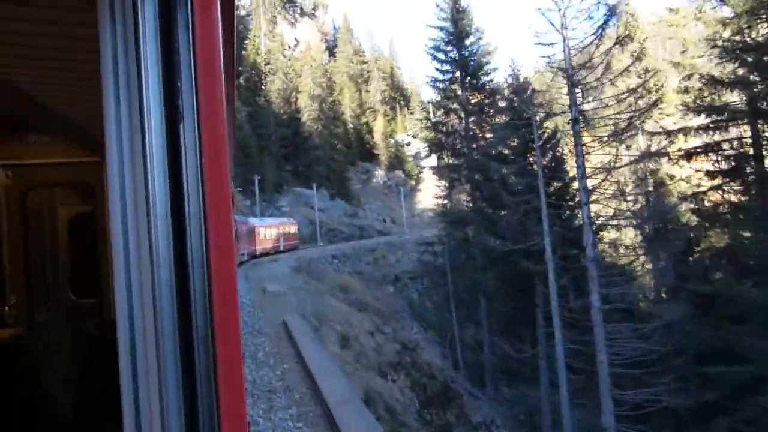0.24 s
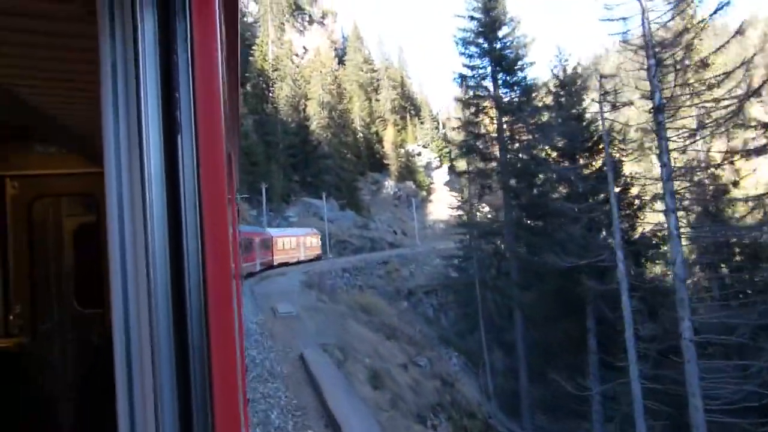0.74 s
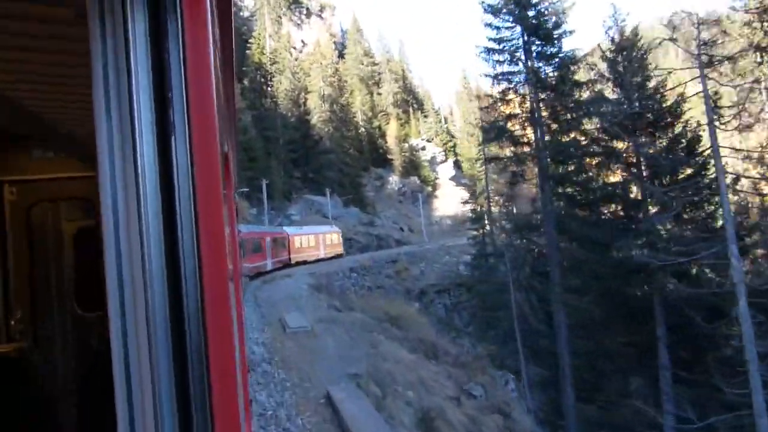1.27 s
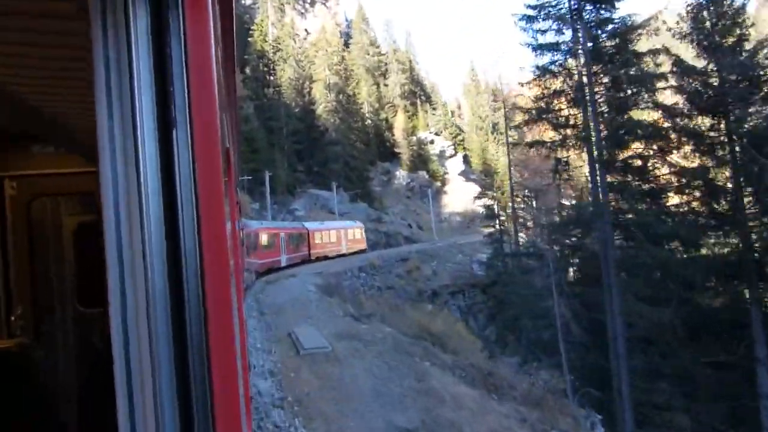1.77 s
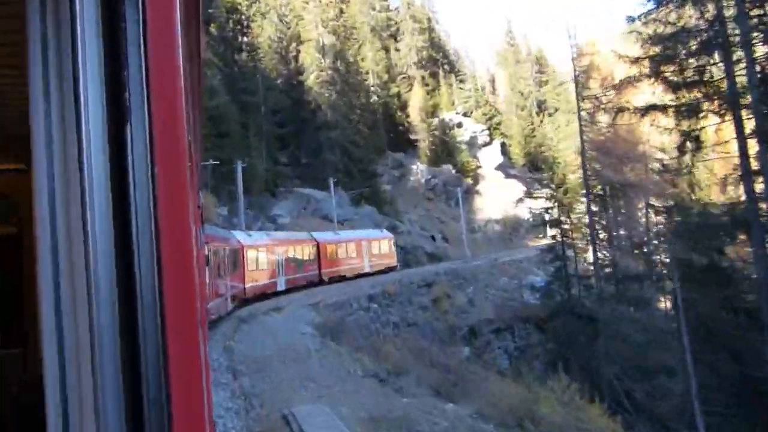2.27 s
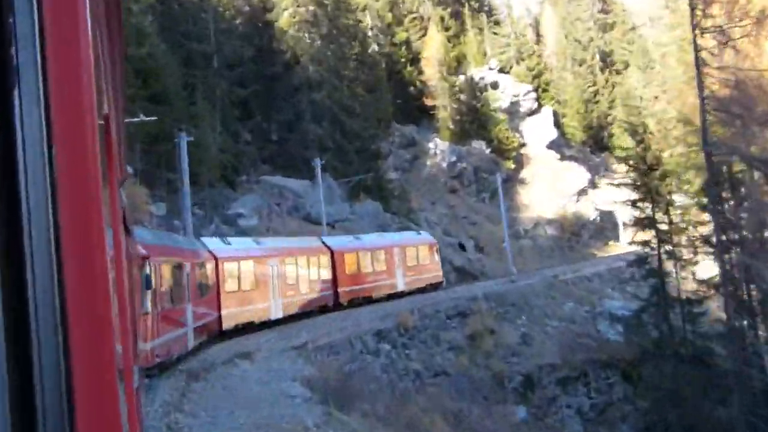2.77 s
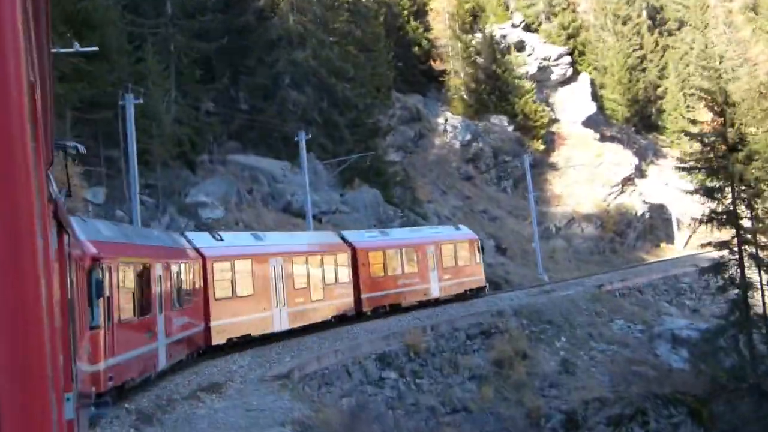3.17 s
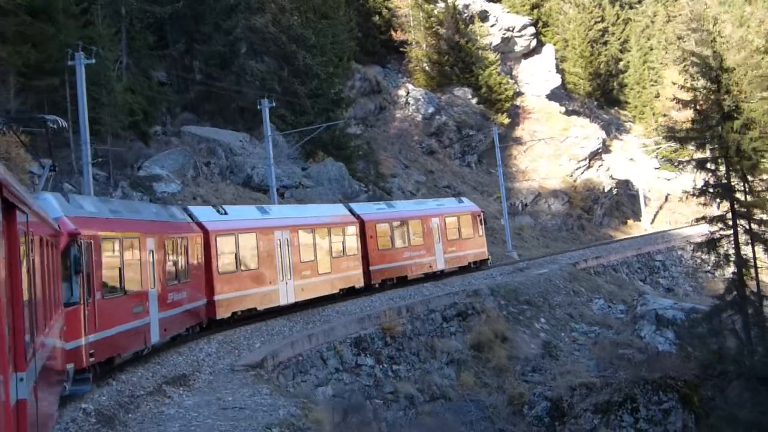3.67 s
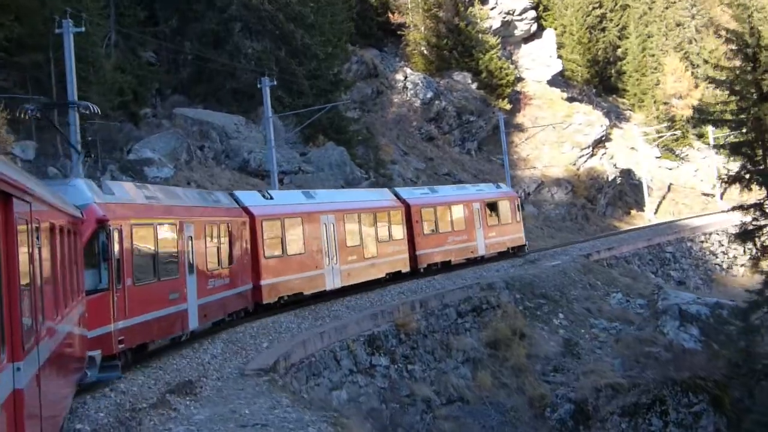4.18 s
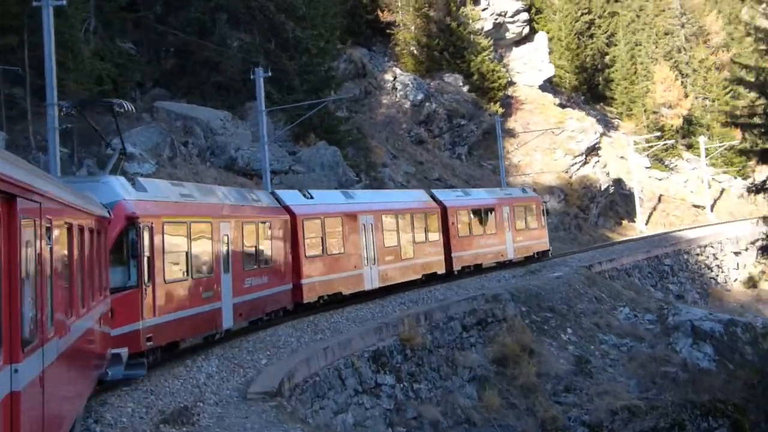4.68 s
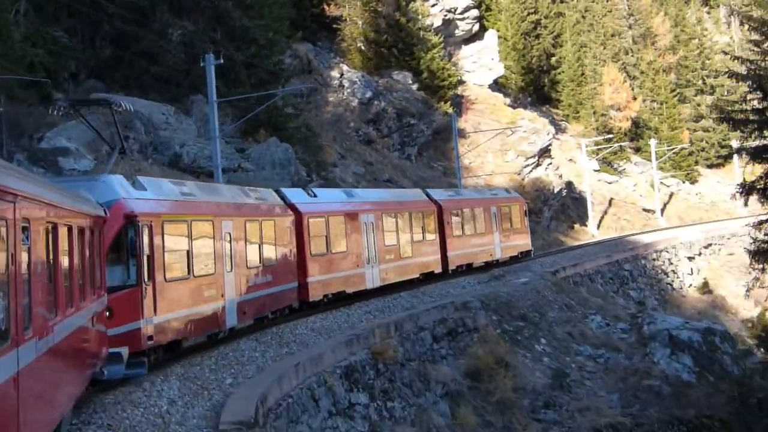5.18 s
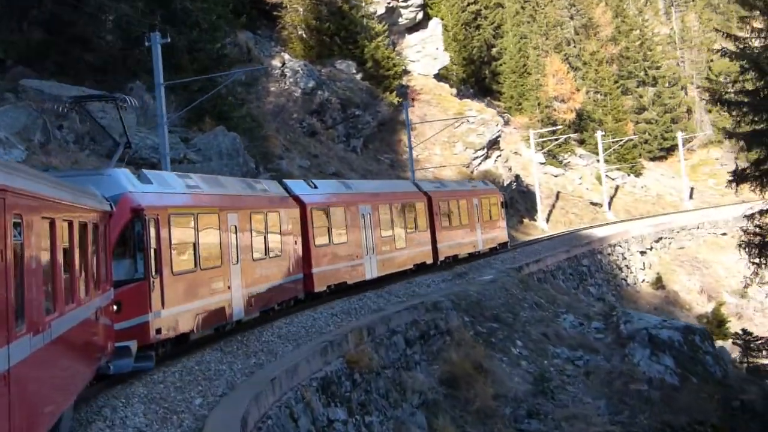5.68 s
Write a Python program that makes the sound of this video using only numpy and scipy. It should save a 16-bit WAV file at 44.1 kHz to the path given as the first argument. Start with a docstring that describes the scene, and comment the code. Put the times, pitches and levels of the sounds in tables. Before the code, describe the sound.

Piercing wheel squeals swell and overlap as a train rounds a bend, with rumble, hiss and gusts at an open window.

```python
"""Wheels squeal as a narrow-gauge train rounds a tight mountain curve, heard from an open carriage window.
Sideways slip on the rails excites their modes; each tone arrives once direct and pure, and many times
off passing ballast, rocks and trees, smeared by Doppler shift. Beneath it the wheels roar and hiss,
flanges scrape and jolts make the carriage boom. Gusts buffet the microphone, and the strong ones
make a limiter duck the whole sound."""
import sys
import numpy as np
from scipy import signal
from scipy.fft import rfft, irfft, next_fast_len
from scipy.io import wavfile
from scipy.ndimage import uniform_filter1d

SR = 44100
rng = np.random.default_rng(int(sys.argv[2]) if len(sys.argv) > 2 else 0)


def to_wav(s):
    """Save 16-bit WAV."""
    ch = np.atleast_2d(s).T  # columns
    pcm = np.round(np.clip(ch, -1, 1) * 32767)  # PCM
    wavfile.write(sys.argv[1], SR, pcm.astype(np.int16))


N = 261513
TIME = np.arange(N) / SR
FREQ = np.fft.rfftfreq(N, 1 / SR)
TRAIN_SPEED, SOUND_SPEED = 5.8, 343  # m/s


def undb(db):
    """Amplitude ratio of a level in decibels."""
    return 10 ** (np.asarray(db) / 20)


def envelope(rows, column):
    """Gain over time, interpolated in decibels from one column of a table."""
    rows = np.asarray(rows)
    return undb(np.interp(TIME, rows[:, 0], rows[:, column]))


def swell(start, end, db, growth, decay):
    """Envelope of a self-excited vibration: exponential growth, saturation, exponential decay."""
    return undb(db - growth * np.maximum(start - TIME, 0) - decay * np.maximum(TIME - end, 0))


def pulse(at, half_length):
    """Gaussian pulse in time, 1 at its peak."""
    return np.exp(-.5 * np.minimum(((TIME - at) / half_length) ** 2, 100))


def colour(points):
    """Spectral envelope through (f/Hz, level/dB) points on a logarithmic frequency axis."""
    hz, db = np.transpose(points)
    return undb(np.interp(np.log(FREQ + 1), np.log(hz), db))


def resonance(hz, width_hz):
    """Lorentzian resonance curve over frequency, 1 at its centre."""
    return 1 / (1 + (2 * (FREQ - hz) / width_hz) ** 2)


def noise(shape):
    """White noise filtered by a spectral envelope; rms 1."""
    size = next_fast_len(N)
    gain = np.interp(np.fft.rfftfreq(size, 1 / SR), FREQ, shape)
    x = irfft(rfft(rng.standard_normal(size)) * gain, size)[:N]
    return x / x.std()


def wander(rate_hz):
    """Slow random modulation: low-passed noise of standard deviation 1."""
    step, size = 64, 4096
    times = TIME[::step]
    rolloff = 1 + (np.fft.rfftfreq(size, step / SR) / rate_hz) ** 4
    slow = irfft(rfft(rng.standard_normal(size)) / rolloff)
    return np.interp(TIME, times, slow[:len(times)] / slow.std())


def stereo(mid, side):
    """Left and right as the sum and difference of mid and side."""
    return np.array([mid + side, mid - side])


def rolling_noise():
    """Roughness excitation: steel on steel makes rails and bogies roar and the contact patches hiss."""
    # rolling noise at the window: t/s, roar level/dB, hiss level/dB
    levels = [(0, -37.5, -41), (.9, -37.5, -39.5), (1.4, -35.5, -38), (1.62, -38, -39.5), (2, -37.5, -39.5),
              (2.55, -40, -47), (3.3, -41.5, -43), (3.9, -44.5, -45.5), (4.28, -48.5, -47),
              (4.55, -42, -38.5), (4.8, -45.5, -41), (5.25, -42.5, -39.5), (5.6, -43, -44),
              (5.93, -43.5, -38.5)]
    # spectra of roar and hiss: f/Hz, relative level/dB
    roar_spectrum = [(20, -11), (55, -16), (100, -7), (160, -2.5), (300, -1), (480, 2), (700, -1),
                     (900, -2.5), (1200, -8.5), (2000, -13.5), (4000, -63)]
    hiss_spectrum = [(400, -26), (1000, -4.5), (1300, 2.5), (1800, 0.5), (2400, -0.5), (3200, 1), (4000, 6),
                     (6700, -1.5), (8100, -4.5), (8750, 2.5), (9400, -8.5), (10000, -10.5), (12500, -35),
                     (15000, -38)]
    # resonances of rails and bogies: f/Hz, bandwidth/Hz, lift/dB
    bogie_modes = [(687, 39, 5.5), (831, 27, 4.5), (912, 62, 5.5), (1400, 4, 7)]
    peaks = undb(sum(db * resonance(hz, width_hz) for hz, width_hz, db in bogie_modes))
    roar_shape, hiss_shape = colour(roar_spectrum), colour(hiss_spectrum)
    roar = stereo(noise(roar_shape * peaks), undb(-4.5) * noise(roar_shape))
    side_tilt = colour([(1000, -9.5), (3200, -6.5), (6500, -9.5), (8600, -4.5), (14000, 0)])
    hiss = stereo(noise(hiss_shape * peaks), undb(-6.5) * noise(hiss_shape * side_tilt))
    roar = roar * envelope(levels, column=1) * undb(1.55 * wander(23))
    hiss = hiss * envelope(levels, column=2) * undb(1.03 * wander(23))
    return roar + hiss


def carriage_boom():
    """Forced vibration: jolts from uneven track drive the low resonance of the carriage body."""
    # jolts: t/s, level/dB, half length/s
    jolts = [(4.547, -42, 0.12), (5.09, -40, 0.031), (5.332, -38.5, 0.029), (5.534, -45, 0.022),
             (5.718, -40, 0.034)]
    body = resonance(hz=199, width_hz=37)
    shaking = sum(undb(db) * pulse(at, half_length) for at, db, half_length in jolts)
    return stereo(noise(body), undb(-30) * noise(body)) * shaking


def flange_scrape():
    """Sliding friction: wheel flanges rub the rail head with a bright, uneven hiss."""
    # flange contacts: hold from t/s, hold until t/s, level/dB, growth/(dB/s), decay/(dB/s)
    contacts = [(1.285, 1.473, -45.5, 102, 12), (1.831, 1.99, -58, 36, 92), (2.564, 2.688, -43, 83, 38),
                (5.88, 5.93, -50.5, 26, 50)]
    shape = colour([(5000, -18), (8000, 8.5), (9300, -2.5), (10500, 3), (13500, -8.5), (15000, -17)])
    rubbing = sum(swell(*contact) for contact in contacts)
    return stereo(noise(shape), undb(-6) * noise(shape)) * rubbing * undb(1.2 * wander(25))


def wind_buffet():
    """Turbulence: eddies press infrasonically on the microphone ports and flutter there in antiphase."""
    # eddies striking the microphone: t/s, pressure level/dB, half length/s, flutter level/dB
    gusts = [(0.039, 3.2, 0.013, -17), (0.107, 2, 0.048, -24), (0.254, 3, 0.018, -12),
             (0.485, 2.3, 0.0085, -12.5), (1.028, 3, 0.046, -19.5), (1.114, 6.5, 0.021, -8),
             (1.175, 2.5, 0.026, -17), (1.555, 0.7, 0.038, -26.8), (1.745, 0.5, 0.0076, -20),
             (2.056, 3.5, 0.022, -16), (2.131, 1.4, 0.048, -23), (2.219, 10.5, 0.0069, -6.5),
             (2.369, 11, 0.023, -2.4), (2.492, 10, 0.022, -8.5), (2.616, 1, 0.059, -16.5),
             (2.778, 4.5, 0.028, -15.5), (2.952, 1.1, 0.013, -19), (3.174, 1, 0.0049, -20.5),
             (3.36, 1.5, 0.029, -21.2), (3.561, -1, 0.024, -19.5), (3.636, 0.6, 0.021, -19),
             (3.967, -4, 0.0068, -24.5), (4.703, -3.5, 0.044, -28), (4.782, -2.5, 0.022, -25.5),
             (4.922, 0, 0.035, -21.5), (5.334, -3, 0.022, -32), (5.414, 0, 0.0042, -24),
             (5.633, -5.5, 0.031, -31.5), (5.799, -4.5, 0.014, -32)]
    # spectrum of the flutter: f/Hz, relative level/dB
    flutter_spectrum = [(25, -48), (52, -29), (100, -8.5), (150, -1.5), (200, 3.5), (320, -3.5),
                        (450, -6.5), (650, -15.5), (900, -26.5), (1200, -36.5), (2400, -54), (5000, -88)]
    wake_db, wake_s, longest_push_s = -18.5, 0.16, 0.025
    pressure = 0
    power = undb(-55 + 6.5 * wander(22)) ** 2  # patchy breeze between the gusts
    for at, push_db, half_length, flutter_db in gusts:
        eddy = pulse(at, half_length)
        wake = undb(wake_db) * (TIME > at) * np.exp(-np.abs(TIME - at) / wake_s)
        pressure = pressure + undb(push_db) * pulse(at, min(half_length, longest_push_s))
        power = power + undb(flutter_db) ** 2 * (eddy ** 2 + wake ** 2)
    flutter = np.sqrt(power) * undb(2.85 * wander(70))
    # harder gusts shed smaller eddies, which sound higher
    force = np.clip(np.sqrt(power) / undb(-9.5), 0, 1)
    shape = colour(flutter_spectrum)
    small_eddies = noise(shape * colour([(120, -9), (300, -3.5), (1200, -3)]))
    large_eddies = noise(shape)
    opposed = flutter * (np.sqrt(1 - force) * large_eddies + np.sqrt(force) * small_eddies)
    # a weaker, deeper thump reaches both ports in phase
    thump = flutter * undb(-20) * noise(shape * colour([(60, 10), (110, 9.5), (220, -2.5), (1000, 8)]))
    imbalance = undb(-25) * opposed  # the right port faces the draught a little more
    return stereo(thump - imbalance, opposed + pressure)


def trunk_echoes(hz, trunks):
    """Doppler effect: echoes off passing trees and masts glide from sharp to flat and beat; rms 1."""
    times = TIME[::16]
    abreast_s, distance, phase_turns = trunks.T[:, :, None]
    slant_range = np.hypot(TRAIN_SPEED * (times - abreast_s), distance)
    round_trip_cycles = 2 * hz * slant_range / SOUND_SPEED
    phasors = distance / slant_range * np.exp(2j * np.pi * (phase_turns - round_trip_cycles))
    echoes = (np.interp(TIME, times, phasors.sum(axis=0)) * np.exp(2j * np.pi * hz * TIME)).real
    return echoes / echoes.std()


def wheel_mode(hz, direct_share, trunks):
    """Doppler broadening: scattering off the passing landscape sets a wheel's tone in a noise band."""
    # wheel and microphone travel together, so the direct tone has no Doppler shift
    pitch = hz * (1 + .00028 * wander(6) + .00025 * wander(.6))
    tone = np.sqrt(2) * np.sin(2 * np.pi * np.cumsum(pitch) / SR) * undb(1.8 * wander(12))
    # ballast and rock ahead answer sharp, those behind flat, by about twice the Mach number
    centre_offset, flank_exponent = 0.0059, 5.35
    shift = np.abs(FREQ / hz - 1 - centre_offset) / (2 * TRAIN_SPEED / SOUND_SPEED)
    band = 1 / np.sqrt(1 + shift ** flank_exponent)
    trunk_share = .25  # of the power in the mid signal
    mid = np.sqrt(1 - trunk_share) * noise(band) + np.sqrt(trunk_share) * trunk_echoes(hz, trunks)
    echoes = stereo(mid, undb(-11.5) * noise(band)) * undb(1.37 * wander(61))
    direct_gain = np.minimum(direct_share, .95)
    return direct_gain * tone + np.sqrt(1 - direct_gain ** 2) * echoes


def wheel_squeal():
    """Self-excited oscillation: a mode sings while sideways slip feeds it; a few always ring faintly."""
    # wheel modes (low groan and howl, main squeals A-D, weak side tones E and F): name -> f/Hz
    modes = {"groan": 425, "howl": 449, "A": 4345, "B": 5275, "C": 6037, "D": 7294, "E": 10569, "F": 3661}
    # spells of slip:
    # mode, hold from t/s, hold until t/s, level/dB, growth/(dB/s), decay/(dB/s), direct share/dB
    slips = [("A", 0.096, 1.075, -27.5, 64, 95, -16), ("A", 1.304, 1.62, -22, 96, 44, -7.5),
             ("A", 1.92, 2.01, -32, 80, 42, -4), ("A", 3.41, 3.81, -24, 100, 420, -3),
             ("A", 4.007, 4.32, -22.5, 31, 89, -2.4), ("A", 4.44, 4.72, -22.5, 130, 15, -6.5),
             ("A", 5.34, 5.36, -25, 85, 14, -1.37), ("B", .04, 0.6, -29, 160, 16.4, -5.5),
             ("B", 0.9, 1.92, -35, 21, 41, -6.5), ("B", 2.67, 2.87, -27, 21, 34, -3.5),
             ("B", 3.33, 3.74, -39, 140, 64, -0.5), ("C", 1.69, 2.6, -38.5, 110, 45, -18),
             ("C", 2.54, 3.21, -28.5, 30, 180, -6), ("C", 3.35, 3.72, -25.5, 24, 28, -13),
             ("C", 3.886, 3.95, -25.5, 150, 54, -3), ("C", 4.16, 4.13, -24, 157, 30, -4.5),
             ("C", 4.45, 4.92, -33, 158, 92, -6.5), ("D", 0, 0.2, -49.5, 60, 30, -5),
             ("D", 1.2, 1.95, -49, 97, 100, -5), ("D", 2.52, 3.76, -27.5, 47, 87, -3.5),
             ("D", 4.25, 5.01, -28, 13, 47, -6), ("D", 5.25, 5.49, -27, 64, 15.7, -7),
             ("E", 0.41, .92, -63, 15, 70, -13), ("E", 3.61, 4.05, -45, 55, 30, -3),
             ("F", 2.72, 2.78, -48, 150, 120, -2.5), ("F", 4.6, 5.3, -56, 8, 15, 2),
             ("howl", 0.796, 0.81, -33.5, 92, 42, -7), ("howl", 1.3, 2.66, -41.5, 18, 9.9, -5),
             ("howl", 3.05, 3.5, -43, 12, 58, -6), ("groan", 4.37, 5.34, -47.5, 73, 44, -7),
             ("groan", 5.85, 5.93, -37, 115, 50, -5)]
    # modes that ring throughout: f/Hz, level/dB
    faint_modes = [(1152, -61.5), (2130, -64), (2819, -64), (8919, -56.5), (11353, -99)]
    # trees and masts along the line: abreast at t/s, distance/m, phase/turns
    trunks = rng.uniform([-1, 3, 0], [8, 9, 1], size=(18, 3))
    squeal = sum(undb(db) * wheel_mode(hz, undb(-8), trunks) for hz, db in faint_modes)
    for name, hz in modes.items():
        spells = [(swell(*shape), undb(direct_db)) for mode, *shape, direct_db in slips if mode == name]
        drive = np.sqrt(sum(gain ** 2 for gain, _ in spells))  # overlapping spells add in power
        direct = np.sqrt(sum((gain * share) ** 2 for gain, share in spells))
        grip = undb(0.98 * wander(2.6))
        squeal = squeal + drive * grip * wheel_mode(hz, direct / drive, trunks)
    return squeal


def scene():
    """Superposition of squeal, running noise and wind at the window."""
    return wheel_squeal() + rolling_noise() + flange_scrape() + carriage_boom() + wind_buffet()


def record(dry):
    """Limiting: the gain drops under strong gusts and recovers slowly; filters cut rumble and top."""
    ceiling_db, recovery_db_per_s, attack_s = -7.5, 32, 0.018
    wind_cut_hz, top_hz = 54, 15000
    window = int(attack_s * SR)
    power = uniform_filter1d((dry ** 2).mean(axis=0), window)
    level_db = 10 * np.log10(np.maximum(power, 1e-12))
    excess_db = np.maximum(level_db - ceiling_db, 0)
    recovery_db = recovery_db_per_s * TIME
    duck_db = np.maximum.accumulate(excess_db + recovery_db) - recovery_db
    limited = dry * undb(-uniform_filter1d(duck_db, window))
    wind_filter = signal.butter(5, wind_cut_hz, btype="high", fs=SR, output="sos")
    top_filter = signal.ellip(8, .2, 70, top_hz, fs=SR, output="sos")
    return signal.sosfilt(top_filter, signal.sosfilt(wind_filter, limited))


dry = scene()
out = record(dry)
to_wav(out)
```